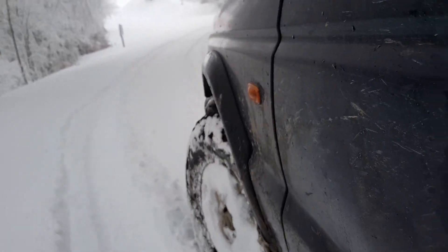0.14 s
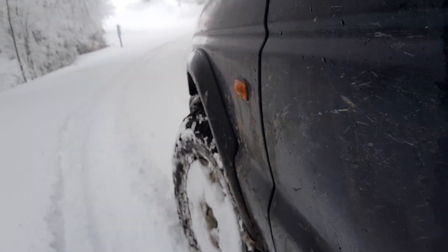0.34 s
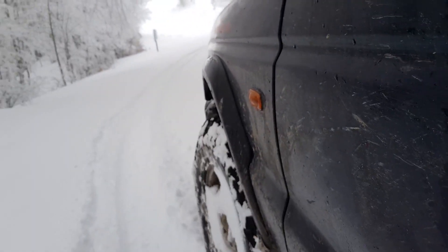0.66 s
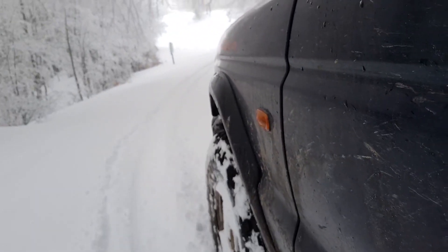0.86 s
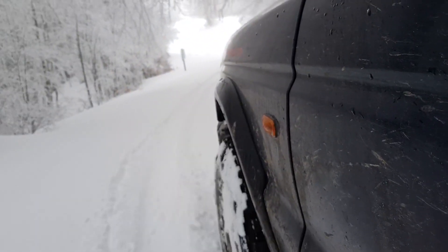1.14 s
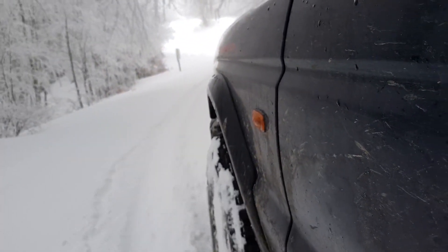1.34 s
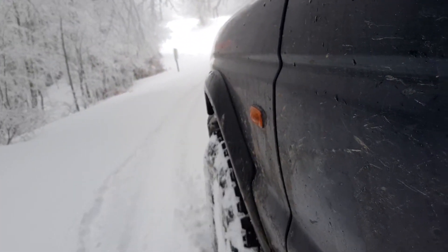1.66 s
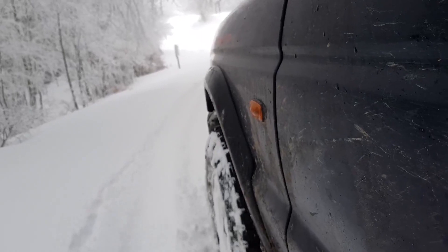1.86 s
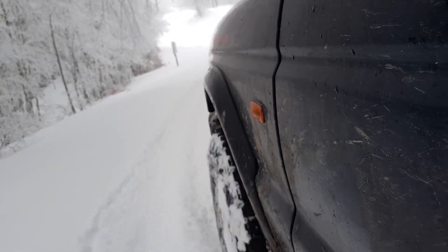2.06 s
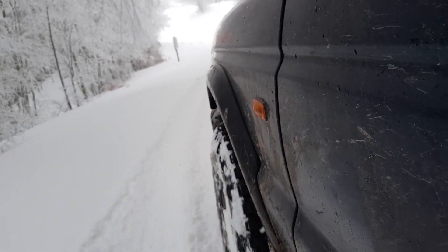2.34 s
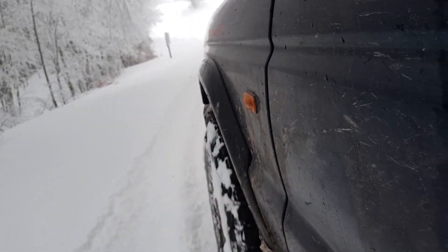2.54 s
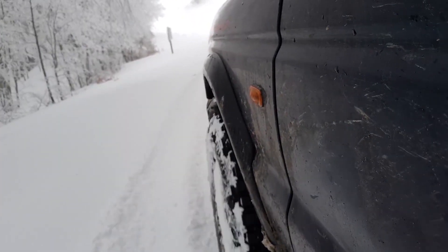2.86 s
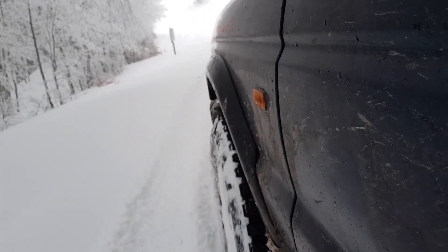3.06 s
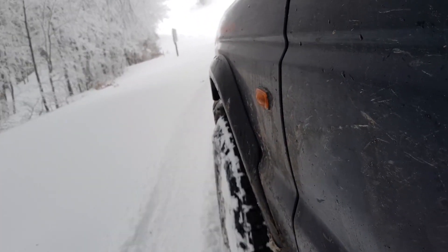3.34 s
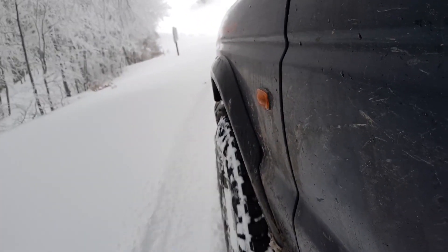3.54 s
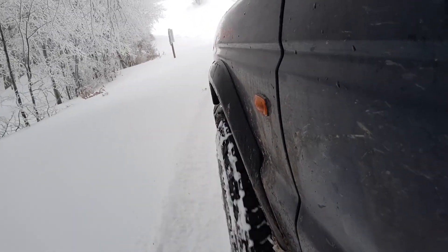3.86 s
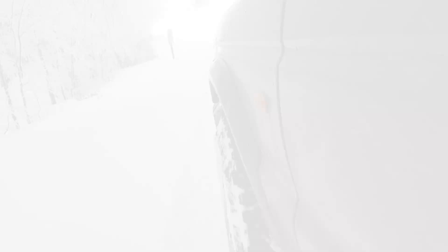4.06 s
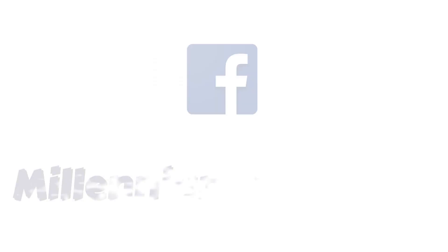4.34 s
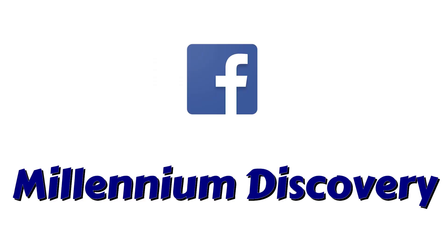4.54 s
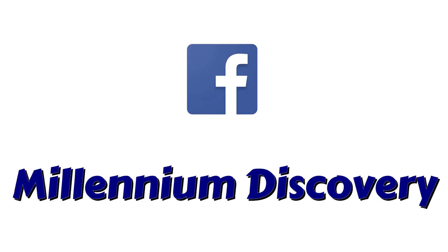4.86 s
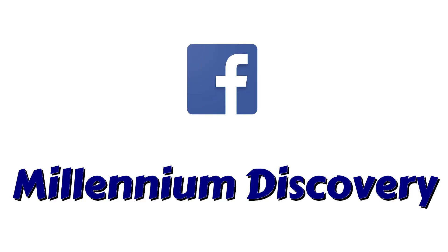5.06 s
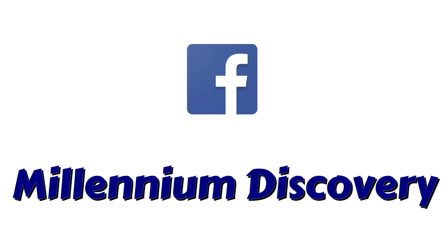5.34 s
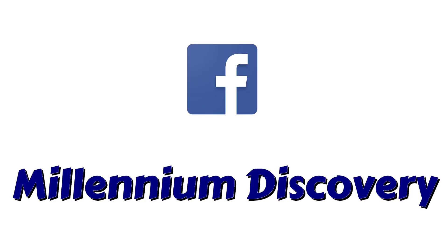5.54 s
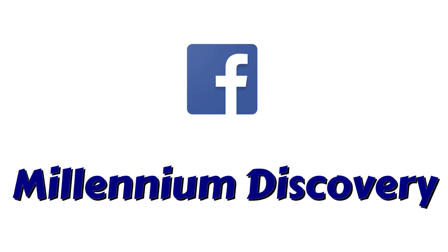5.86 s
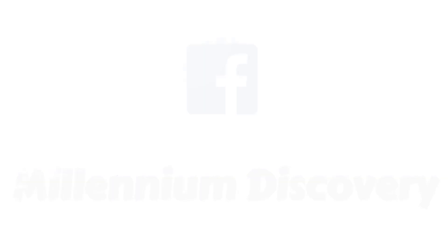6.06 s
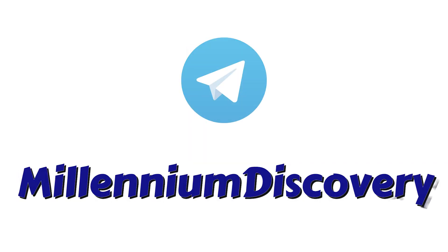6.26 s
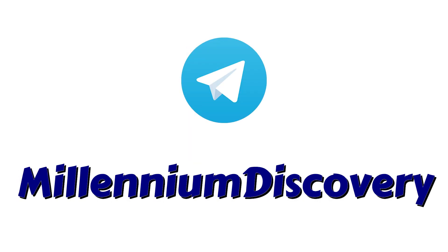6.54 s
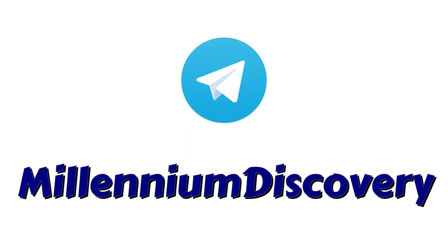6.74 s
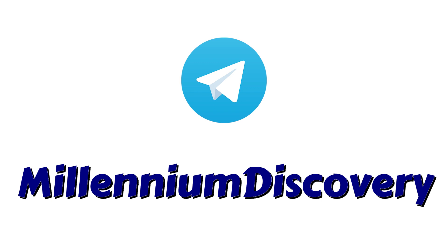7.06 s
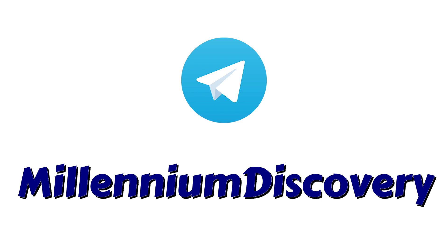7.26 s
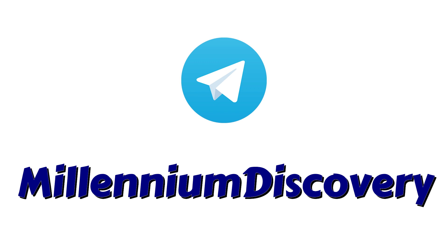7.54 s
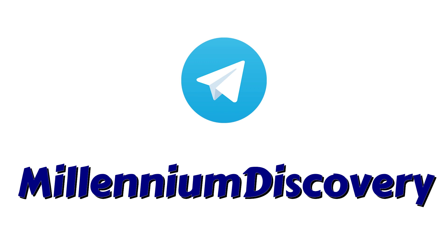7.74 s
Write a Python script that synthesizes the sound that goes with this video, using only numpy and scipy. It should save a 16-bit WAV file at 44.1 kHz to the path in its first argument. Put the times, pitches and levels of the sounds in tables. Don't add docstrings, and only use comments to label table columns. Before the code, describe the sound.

Outdoor close stereo pickup by a van's wheel arch. A labouring five-cylinder diesel swells from silence, clattering and shuddering, with tinny rattles and small hard ticks. It speeds up into a steady, dense drone with surging low boom, fan hum and a wide windy rush of tyres on snow. Occasional snow crumbs tick brightly against the arch, faint air leaks sing, and the last second fades out.

```python
import sys
import numpy as np
from scipy import signal
from scipy.fft import rfft, irfft, next_fast_len
from scipy.io import wavfile
from scipy.ndimage import uniform_filter1d

SR = 44100
rng = np.random.default_rng(int(sys.argv[2]) if len(sys.argv) > 2 else 0)


def dump(signal):
    limited = np.clip(np.atleast_2d(signal).T, -1, 1)
    pcm = np.round(limited * 32767).astype(np.int16)
    wavfile.write(sys.argv[1], SR, pcm)


def field_ratio(decibels):
    return 10 ** (np.asarray(decibels, dtype=float) / 20)


N = 348381
T = np.arange(N) / SR
CYLINDERS = 5
FADE_IN_S, FADE_IN_DB_PER_S = 0.58, 41.5
BLOCK_RISE_S = 0.00057


def level(x, db):
    return x * field_ratio(db) / np.sqrt(np.mean(x ** 2))


def columns(table):
    s, *rest = np.transpose(table)
    return [np.interp(T, s, c) for c in rest]


def on_log(hz, points):
    f, db = np.transpose(points)
    return np.interp(np.log(hz + 1), np.log(f + 1), db)


def peaks(hz, modes):
    return [(db, 1 / (1 + (2 * (hz - f) / width) ** 2)) for f, width, db in modes]


def filtered(x, gain_at):
    size = next_fast_len(N)
    hz = np.fft.rfftfreq(size, 1 / SR)
    return irfft(rfft(x, size) * gain_at(hz), size)[..., :N]


def walk(rate):
    steps = 8
    levels = np.repeat(rng.standard_normal(int(N / SR * rate) + 2), steps)
    smooth = uniform_filter1d(uniform_filter1d(levels, steps), steps)
    return np.interp(T * rate * steps, np.arange(len(levels)), 1.01 * smooth)


def orders(turns, table, waver_db, slip):
    out = 0
    for order, db in table:
        strength = np.sqrt(2) * field_ratio(db + waver_db * walk(5))
        phase = order * turns + rng.random() + slip * walk(3.6)
        out = out + strength * np.sin(2 * np.pi * phase)
    return out


def struck(modes, scatter_db, rise_s, square=False):
    t = np.arange(4096) / SR
    out = 0
    for hz, db, t60 in modes:
        sign = 1 if square else rng.choice([-1, 1])
        weight = sign * field_ratio(db + scatter_db * rng.standard_normal())
        decay = np.exp(-np.log(1000) * t / t60) * (1 - np.exp(-t / rise_s))
        out = out + weight * np.sin(2 * np.pi * hz * t) * decay
    return out


def band_noise(low_hz, high_hz):
    return signal.lfilter(*signal.butter(2, (low_hz, high_hz), "band", fs=SR), rng.standard_normal(4096))


# t/s, level/dB
EFFORT_CURVE = [(0, 3.5), (.7, 0.5), (1.1, -2), (1.5, 0.5), (1.9, 1), (2.5, 1), (3.2, 0.5), (3.9, 1.5),
                (4.6, 0.5), (5.2, 0.5), (5.8, 0.5), (6.4, 1), (7.05, 1.5), (7.9, 0.5)]


def law(speed, level_db, db_per_octave):
    return level_db + db_per_octave * np.log2(speed) + columns(EFFORT_CURVE)[0]


# t/s, firing rate f/Hz
FIRING_RATE = [(0, 45.05), (.25, 46.7), (.75, 55.1), (1, 55.7), (1.25, 58.8), (1.65, 69.6), (2, 74.7),
               (3, 86.2), (3.55, 93.7), (3.85, 96), (4.5, 103.6), (5.15, 104.1), (5.5, 101.5), (6.4, 107.3),
               (7.05, 109.9), (7.25, 109.3), (7.5, 105), (7.85, 109)]


def crank():
    hz = columns(FIRING_RATE)[0]
    hz = hz * (1 + .003 * walk(5) * np.clip(T - 3.2, 0, 1))
    cycle = np.cumsum(hz) / CYLINDERS / SR
    return hz, cycle - np.interp(.72, T, cycle)


# t/s, level/dB
FIRING_SURGE = [(3.3, -1.5), (3.8, -1.5), (4.2, 3), (4.6, -15), (5.1, 7.5), (5.45, 0), (5.7, 7.5),
                (6.05, -10.5), (6.45, 7), (6.8, -8), (7.1, 0), (7.4, 3), (7.9, -17)]
# tone f/Hz, level/dB
FIRING_BOOM = [(45, -25.5), (56, -24.5), (66, -20.5), (76, -19.5), (83, -28), (92, -32), (100, -36),
               (110, -35)]
# tone f/Hz, level/dB
PIPE_OCTAVE = [(90, -39), (116, -38), (130, -29), (141, -39.5), (156, -36), (172, -68), (200, -50),
               (210, -36), (220, -32)]
# tone f/Hz, level/dB
BODY_HUM = [(100, -56), (185, -52), (200, -38), (215, -33), (230, -34), (236, -40), (242, -39)]
# tone f/Hz, level/dB
PIPE_HIGH = [(144, -42), (185, -44.5), (215, -36.5), (254, -31), (266, -30.5), (278, -44.5), (305, -44),
             (340, -53.5)]


def exhaust(hz, cycle):
    waver_db = 1.25 + 2 * np.clip((hz - 85) / 15, 0, 1)
    out = 0
    for order, response in ((5, FIRING_BOOM), (10, PIPE_OCTAVE), (11, BODY_HUM), (16, PIPE_HIGH)):
        db = on_log(hz * order / CYLINDERS, response)
        if order == CYLINDERS:
            db = db + columns(FIRING_SURGE)[0]
        out = out + field_ratio(db) * orders(cycle, [(order, 0)], waver_db, 0.0042)
    return out


# order per engine cycle, level/dB
LUG_ORDERS = [(12, -6), (14, -5), (15, 0), (16, -2), (20, 0), (21, -2), (24, -3), (25, -3), (26, -3),
              (30, -4), (32, -2), (34, -4)]
# firing rate f/Hz, level/dB
LUG_LEVEL = [(45, -44), (55, -43.5), (60, -40.5), (67, -49), (75, -56), (85, -51)]


def lugging(hz, cycle):
    return field_ratio(on_log(hz, LUG_LEVEL)) * orders(cycle, LUG_ORDERS, 4.0, 0.021)


# order per engine cycle, level/dB
INTAKE_ORDERS = [(3, -9), (4, -14), (6, -5), (8, -4), (9, 0), (12, -9), (13, -7), (14, -7), (15, -8),
                 (17, -4), (18, -12)]
# firing rate f/Hz, level/dB
INTAKE_LEVEL = [(45, -48), (60, -50), (76, -50), (87, -53), (93, -40), (100, -42.5), (104, -38.5),
                (110, -33)]


def intake(hz, cycle):
    return field_ratio(on_log(hz, INTAKE_LEVEL)) * orders(cycle, INTAKE_ORDERS, 1.5, 0.035)


# order per engine cycle, level/dB
GEAR_ORDERS = [(42, 5), (43, -3), (47, 2), (50, -5), (51, -5), (52, 1), (53, -3), (54, -1), (55, -7),
               (56, -4), (57, -7), (58, -5), (59, 3), (61, -1), (62, -7), (63, -6), (64, 4), (65, -6),
               (66, -4), (68, -6), (69, -6), (70, -5), (71, -7), (75, -5), (76, -4), (79, -3), (81, -4),
               (83, -2), (84, -3), (86, 0), (88, -2), (89, -3), (90, -2), (93, -3)]
# firing rate f/Hz, level/dB
MESH_LEVEL = [(45, -20), (62, -10), (72, -4), (88, -4), (94, -1.5), (104, -2), (110, -1)]
# f/Hz, width/Hz, level/dB
GEAR_COVER = [(945, 98, -2), (1050, 115, -7), (1175, 91, -3.5), (1245, 84, -2.5), (1320, 116, -7),
              (1475, 160, -3.5), (1816, 108, -5)]


def gears(hz, cycle):
    db = law(hz / 104, -29, 11) - 10.5 + on_log(hz, MESH_LEVEL)
    whine = field_ratio(db) * orders(cycle, GEAR_ORDERS, 2.0, .02)
    return filtered(whine, lambda hz: sum(field_ratio(db) * bell ** 2 for db, bell in peaks(hz, GEAR_COVER)))


def firings(cycle, place, scatter_db, jitter_s):
    at = np.interp(np.arange(-10, int(cycle[-1])) + place, cycle, T, left=-1)
    chance = rng.standard_normal((len(at), 2))
    at = np.clip((at + jitter_s * chance[:, 0]) * SR, 0, N - 2)
    whole, clicks = at.astype(int), np.zeros(N)
    strength = field_ratio(scatter_db * chance[:, 1])
    clicks[whole] = (1 - at + whole) * strength
    clicks[whole + 1] = (at - whole) * strength
    clicks[:2] = 0
    return clicks


# place in the cycle 0-1, thud level/dB, ring level/dB, clatter level/dB
CYLINDER_KNOCKS = [
    (-.02, 0, 0, 0),
    (.2, -3, -7, -5),
    (.41, -3, -5, -3),
    (.61, -3, -7, -3),
    (.81, -3, -5, -4),
]
# f/Hz, level/dB, t60/s
BLOCK_RING = [(1001, -7.5, 0.05), (1132, 1.5, 0.028), (1234, 1, 0.031), (1504, -6.5, 0.052),
              (696, -7.5, 0.029), (1842, -7, 0.033), (2095, -13, 0.025), (2533, -15.5, 0.033),
              (3560, -17.5, 0.035)]
# f/Hz, level per Hz/dB
BLOCK_THUD = [(88, -45), (150, -1), (215, -8), (279, 9.5), (370, 6), (422, -3), (700, -2.5), (900, -12),
              (1170, -58), (1980, -120)]
# f/Hz, width/Hz, level/dB
VALVE_CLATTER = [(3560, 99, 1), (3760, 56, 2), (4000, 460, 4.5), (2840, 170, -16), (2520, 170, 5),
                 (2100, 230, 8.5), (1900, 550, 6)]


def combustion(hz, cycle):
    t = np.arange(4096) / SR
    thud_s = .0038
    thud_pulse = t / thud_s * np.exp(-t / thud_s)
    clatter_pulse = t / 0.001 * np.exp(-t / 0.0028)
    uneven = np.interp(columns(FIRING_RATE)[0], [60, 68], [1, .3])
    ring_uneven = 1.5 - .7 * (1.5 - uneven)
    push, ring, gate = 0, 0, .12
    for place, thud_db, ring_db, clatter_db in CYLINDER_KNOCKS:
        clicks = firings(cycle, place, 1.0, .00004)
        push = push + signal.fftconvolve(clicks * field_ratio(uneven * thud_db), thud_pulse)[:N]
        path = level(struck(BLOCK_RING, 1.8, BLOCK_RISE_S, square=ring_db == 0), 0)
        ring = ring + signal.fftconvolve(clicks * field_ratio(ring_uneven * ring_db), path)[:N]
        valves = signal.fftconvolve(firings(cycle, place, 2.3, 0.00028), clatter_pulse)[:N]
        gate = gate + field_ratio(uneven * clatter_db) * valves
    thud = filtered(push * rng.standard_normal(N), lambda hz: field_ratio(on_log(hz, BLOCK_THUD)))
    hiss = filtered(rng.standard_normal((2, N)),
                    lambda hz: sum(field_ratio(db) * bell for db, bell in peaks(hz, VALVE_CLATTER)))
    speed = hz / 104
    knock = field_ratio(law(speed, -33.5, 2.8)) * level(thud, 0) + field_ratio(law(speed, -44, -3) + 3.5) * level(ring, 0)
    clatter = field_ratio(law(speed, -47, 2.5) - 3.5) * level(gate * hiss, 0)
    return knock, clatter


def engine():
    hz, cycle = crank()
    knock, clatter = combustion(hz, cycle)
    tones = exhaust(hz, cycle) + lugging(hz, cycle) + intake(hz, cycle) + gears(hz, cycle)
    return tones + knock, clatter


# t/s, turns f/Hz
FAN_TURNS = [(0, 18.5), (.8, 20.4), (1.25, 22.6), (2, 28.5), (2.4, 30.15), (3.1, 31.4), (4.5, 34.6),
             (5, 35), (5.7, 34.8), (7, 35.75), (7.9, 35.35)]


def fan_rate():
    return columns(FAN_TURNS)[0]


# order per fan turn, level/dB
FAN_BLADES = [(3, -9), (5, -5), (9, -4), (13, -4), (14, -6), (15, -3), (17, -8), (28, -16)]
# fan turns f/Hz, level/dB
FAN_LEVEL = [(18, -45), (22, -43.5), (26.6, -51), (29, -65), (32, -44.5), (33.8, -38), (36, -35)]
# tone f/Hz, level/dB
ARCH_HUM = [(200, -64), (350, -52), (366, -33.5), (382, -32.5), (386, -31), (391, -34), (395, -39)]
# tone f/Hz, level/dB
FAN_WHINE = [(480, -62), (720, -58), (770, -46), (820, -42), (850, -42), (872, -54), (915, -58), (928, -60)]


def fan():
    hz = fan_rate()
    turns = np.cumsum(hz) / SR
    hum = field_ratio(on_log(11 * hz, ARCH_HUM)) * orders(turns, [(11, 0)], 1.2, .02)
    blades = field_ratio(on_log(hz, FAN_LEVEL)) * orders(turns, FAN_BLADES, 1.9, 0.055)
    whine = field_ratio(on_log(26 * hz, FAN_WHINE)) * orders(turns, [(26, 0.84)], 0.8, 0.05)
    return hum + blades + whine


# level/dB at cruise, growth per doubling of fan speed/dB
RUSH_GROWTH = [
    (-24.5, 8),
    (-39.5, 10.7),
    (-53, 8.8),
    (-67.5, 4.7),
]
# f/Hz, level per Hz/dB
RUSH_COLOUR = [(20, -30), (40, -13.5), (100, -5.5), (220, -5), (390, -8), (450, -9), (800, -11),
               (1300, -16.5), (1700, -19.5), (3000, -28.5), (4400, -33), (4900, -40.5), (7000, -44.5),
               (15700, -54.5)]
# f/Hz, width/Hz, level/dB
HOUSING = [(8000, 650, 5.5), (11100, 2000, 4.5), (5480, 1700, 5.5), (2170, 560, 1.5), (14600, 2400, -0.5)]
# f/Hz, side minus mid level/dB
RUSH_WIDTH = [(60, -13), (110, -29), (200, -15.5), (380, -16), (700, -11.5), (1290, -6.5), (2380, -3),
              (4400, -3), (8120, 1), (15000, 1)]


def rush():
    low_db, *upper = [law(fan_rate() / 35, *rule) for rule in RUSH_GROWTH]
    swell = [low_db - 3.0]
    for db in upper:
        swell.append(db - np.median(db) + np.median(low_db) - 4.5)
    swell = np.array(swell)
    size = next_fast_len(N)
    hz = np.fft.rfftfreq(size, 1 / SR)
    colour = field_ratio(on_log(hz, RUSH_COLOUR) + sum(db * bell for db, bell in peaks(hz, HOUSING)))
    mid, side = rfft(rng.standard_normal((2, size))) * colour
    side = side * field_ratio(on_log(hz, RUSH_WIDTH) - 1.5)
    pair = np.array([mid + side, mid - side]) / np.sqrt(np.mean(irfft(mid) ** 2))
    octave = np.log2((hz + 1) / 30)
    out, crunch, flurry = 0, walk(24.17), walk(14)
    for k in range(10):
        window = np.cos(np.pi / 2 * np.clip(octave - k, -1, 1)) ** 2
        band = irfft(pair * window, size)[:, :N]
        part = np.interp(k, [4, 5.3, 8, 9], range(4))
        share = np.clip(1 - abs(part - np.arange(4)), 0, 1)
        flicker_db = -0.76 * share[0] * crunch + 0.96 * share[2:].sum() * flurry + 0.78 * walk(25)
        out = out + band * field_ratio(share @ swell + flicker_db)
    return out


def snow_spray():
    t = np.arange(600) / SR
    chance = rng.random((2, N))
    grains = (chance[0] < 30 / SR) * field_ratio(-2.2 * np.log(1 - chance[1]))
    spray = signal.fftconvolve(grains, np.exp(-t / .004))[:N] * rng.standard_normal((2, N))
    return field_ratio(-69) * filtered(spray, lambda hz: 1 / (1 + (9000 / (hz + 1)) ** 4))


# t/s, peak level/dB
VALVE_TICKS = [(.046, -61), (.157, -53), (.204, -55), (.267, -52), (0.2493, -53), (0.3122, -55),
               (0.3291, -53), (0.3715, -50), (0.4324, -46), (0.4928, -43), (0.5317, -35), (0.5721, -42),
               (0.588, -40), (0.626, -38), (0.6644, -42), (0.682, -39), (0.7182, -33), (0.7532, -41),
               (0.7726, -35), (0.8135, -36), (0.8435, -41), (0.8988, -40), (0.9338, -37), (0.9697, -40),
               (0.9886, -41), (1.0779, -40.5), (1.1478, -47), (1.1967, -40), (1.2525, -43), (1.284, -40),
               (1.3039, -44), (1.3214, -40), (1.3648, -42), (1.3852, -43), (1.4162, -37), (1.4476, -39),
               (1.5553, -45), (1.6002, -40)]
# f/Hz, level/dB, t60/s
TAPPET_RING = [(3440, 3.5, 0.022), (3750, -4, 0.017), (4200, -10, .012), (5600, -15, .01),
               (2650, -1.5, .015)]


def tappets():
    out, t = np.zeros(N + 8192), np.arange(4096) / SR
    bounce_s, bounce_db, tick_db, scrape_db = 0.0086, -5.5, -6, -6
    for s, db in VALVE_TICKS:
        lift_db = FADE_IN_DB_PER_S * max(FADE_IN_S - s, 0)
        scrape = band_noise(3200, 4400) * np.exp(-t / .014)
        for late_s, down_db in ((0, 0), (bounce_s * (1 + rng.random()), bounce_db)):
            at = int((s + late_s) * SR)
            hit = struck(TAPPET_RING, 3.0, BLOCK_RISE_S) + field_ratio(scrape_db) * scrape
            out[at:at + 4096] += field_ratio(db + lift_db + tick_db + down_db) * hit
    return out[:N]


# t/s, peak level/dB
SHIELD_RATTLES = [(.33, -33), (.433, -33), (.492, -25.5), (.513, -35), (.532, -40), (.552, -47),
                  (.589, -29), (0.609, -34), (0.627, -41), (0.684, -27.5), (.7, -36), (0.719, -37),
                  (0.774, -33.5), (.808, -39), (.898, -42), (0.991, -41), (1.165, -47), (1.322, -36)]
# f/Hz, level/dB, t60/s
SHIELD_RING = [(1475, -1, 0.042), (1785, -11, 0.062), (2870, -12.5, 0.05), (3390, -11, 0.036),
               (3600, -16, .03), (7850, -29, .09), (8340, -30, 0.066)]


def shield():
    out, t = np.zeros(N + 4096), np.arange(4096) / SR
    sizzle_s = 0.027
    for s, db in SHIELD_RATTLES:
        at = int(s * SR)
        ring = struck(SHIELD_RING, 2.0, 0.0037)
        jangle = (band_noise(1300, 3900) + 0.03 * rng.standard_normal(4096)) * np.exp(-t / 0.0071)
        sizzle = np.diff(rng.standard_normal(4097)) * t / sizzle_s * np.exp(1 - t / sizzle_s)
        out[at:at + 4096] += field_ratio(db) * (1.7 * ring + 0.79 * jangle + field_ratio(-29) * sizzle)
    return out[:N]


# t/s, peak level/dB, f/Hz
SNOW_CRUMBS = [(.69, -50, 11500), (1.012, -55, 9700), (1.062, -47, 10200), (1.34, -50, 10600),
               (1.346, -47, 11200), (1.353, -49, 11800), (1.36, -51, 10800), (1.645, -50, 10600),
               (1.82, -56, 11000), (2.525, -56, 9700), (2.83, -56, 8000), (4.721, -43, 10000),
               (6.726, -48, 9000)]


def crumbs():
    out, t = np.zeros(N + 600), np.arange(600) / SR
    for s, db, hz in SNOW_CRUMBS:
        at = int(s * SR)
        tick = np.sin(2 * np.pi * hz * t) + .6 * rng.standard_normal(600)
        out[at:at + 600] += field_ratio(db) * tick * np.exp(-t / .003)
    return out[:N]


def whistle(hz, db, width_hz):
    breath = uniform_filter1d(rng.standard_normal((2, N)), int(SR / width_hz), axis=1)
    return field_ratio(db) * level(breath, 1.3) * np.sin(2 * np.pi * np.cumsum(hz) / SR)


# t/s, f/Hz
TURBO_PITCH = [
    (1.3, 9000),
    (1.8, 10200),
    (2.2, 11500),
    (3.4, 14300),
    (3.8, 15600),
    (4.4, 17200),
    (6, 17500),
    (6.6, 18000),
]
# tone f/Hz, level/dB
TURBO_LEVEL = [(9000, -90), (10200, -72), (11500, -69), (14300, -72), (15600, -70), (17200, -80)]
# tone f/Hz, level/dB
TURBO_HALF_LEVEL = [(6600, -95), (7200, -89), (7800, -64), (8550, -60), (8650, -66), (9000, -64)]


def turbo():
    hz = columns(TURBO_PITCH)[0]
    high = whistle(hz, on_log(hz, TURBO_LEVEL), 250.)
    return high + whistle(hz / 2, on_log(hz / 2, TURBO_HALF_LEVEL), 300.)


# t/s, f/Hz, level/dB
BOOST_LEAK = [
    (1.8, 4090, -67),
    (2.2, 4030, -48),
    (2.8, 4030, -59),
    (3.1, 4020, -60),
    (3.6, 4026, -49.5),
    (4.3, 3750, -48),
    (5.3, 3670, -48),
    (5.8, 3760, -67),
    (7.9, 3760, -47),
]


def boost_leak():
    return whistle(*columns(BOOST_LEAK), 120.)


def scene():
    body, clatter = engine()
    centre = body + fan() + tappets() + shield() + crumbs()
    wide = clatter + 0.69 * clatter[::-1] + rush() + snow_spray()
    return centre + wide + turbo() + boost_leak()


def roll_off(x):
    return signal.sosfilt(signal.butter(12, 15780, fs=SR, output="sos"), x)


# f/Hz, left lead/radians
PORT_LEAD = [(20, 0), (300, 0.1), (1460, -0.1), (1810, -1.3), (3010, 0), (3700, -1), (4390, -0.1),
             (9400, 0), (10500, -2.5), (15300, -2.5)]
# f/Hz, left minus right level/dB
PORT_BALANCE = [(60, 0.76), (700, .5), (1300, 1.1), (2400, 2), (4400, -0.8), (8100, 0.5), (15000, 1)]


def record(dry):
    side = np.array([[.5], [-.5]])

    def port_gain(hz):
        low_cut = hz ** 2 / (hz ** 2 + 12 ** 2)
        return low_cut * field_ratio(side * on_log(hz, PORT_BALANCE)) * np.exp(1j * side * on_log(hz, PORT_LEAD))

    fade_in_db = FADE_IN_DB_PER_S * (T - FADE_IN_S)
    fade_out_db = -49 * np.clip(T - 7.159, 0, 1) ** 1.305
    fade_db = np.minimum(0, np.minimum(fade_in_db, fade_out_db))
    fade_db = uniform_filter1d(fade_db, int(0.049 * SR))
    return roll_off(filtered(dry, port_gain) * field_ratio(fade_db))


dry = scene()
out = record(dry)
dump(out)
```